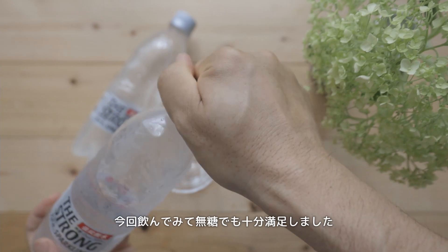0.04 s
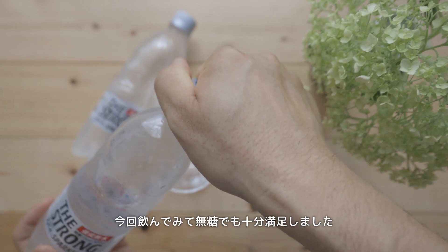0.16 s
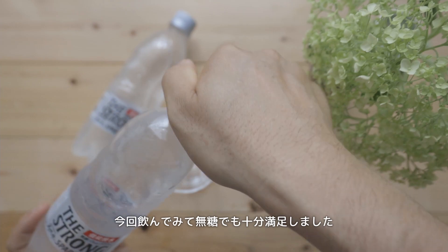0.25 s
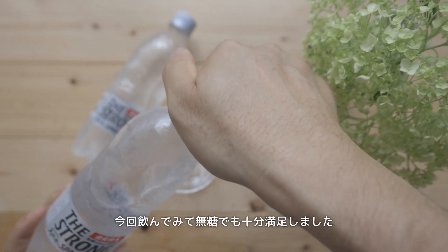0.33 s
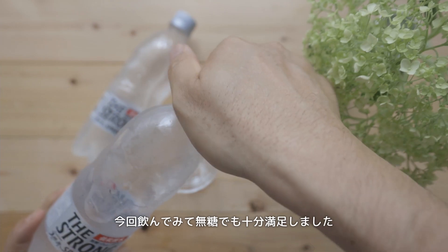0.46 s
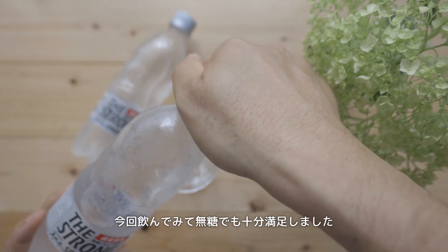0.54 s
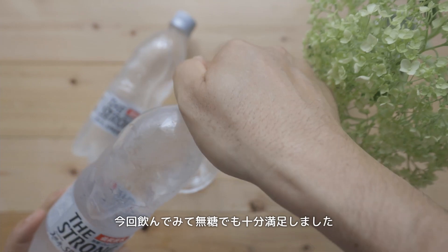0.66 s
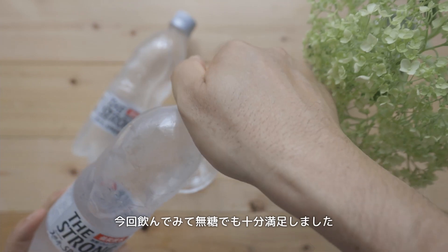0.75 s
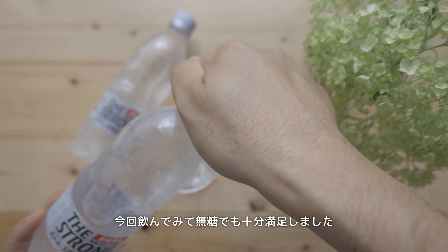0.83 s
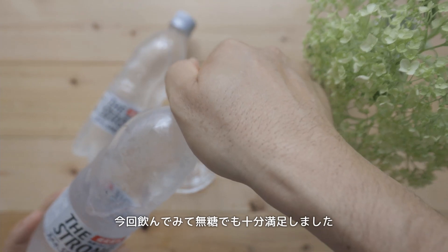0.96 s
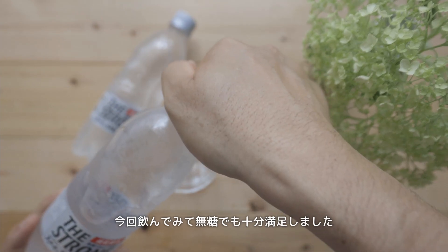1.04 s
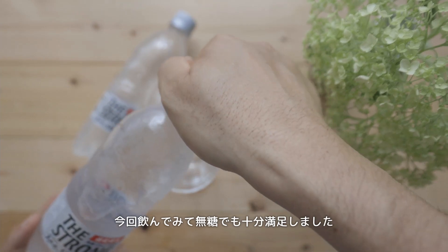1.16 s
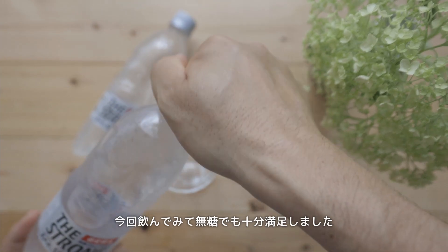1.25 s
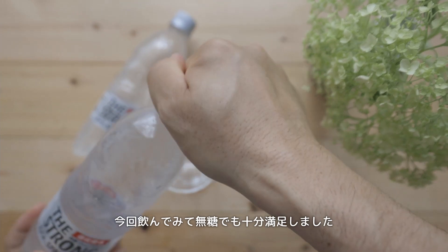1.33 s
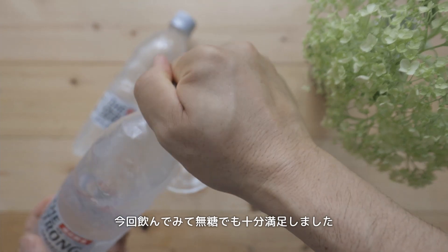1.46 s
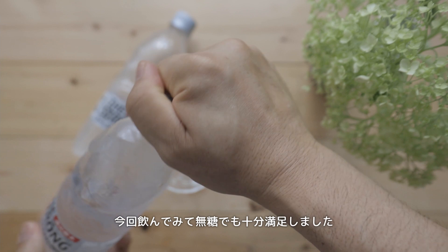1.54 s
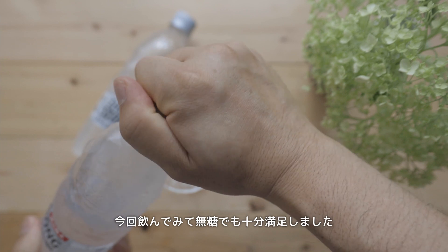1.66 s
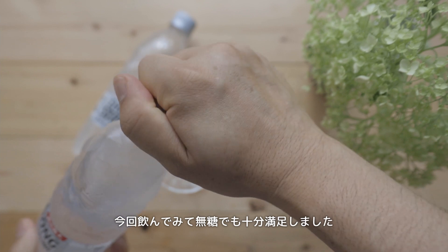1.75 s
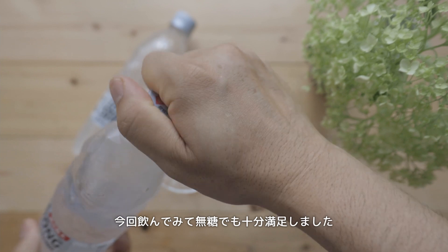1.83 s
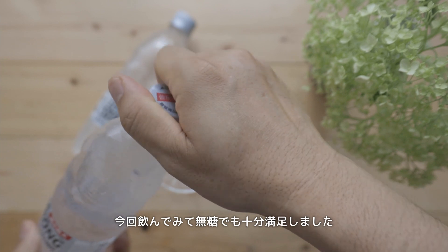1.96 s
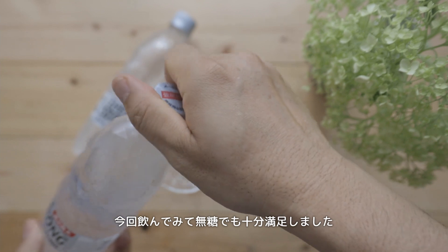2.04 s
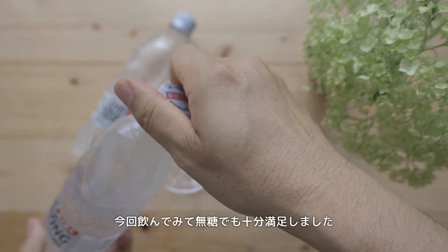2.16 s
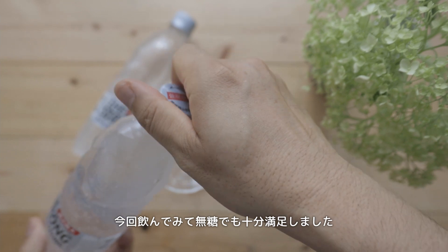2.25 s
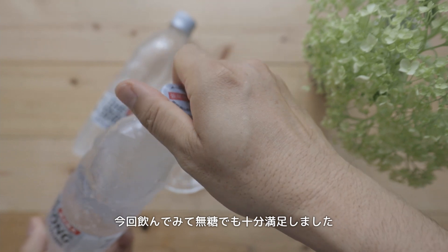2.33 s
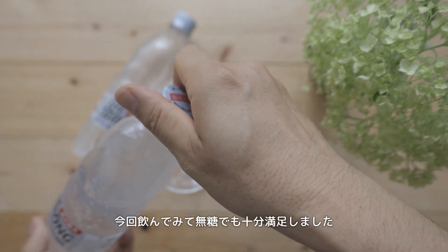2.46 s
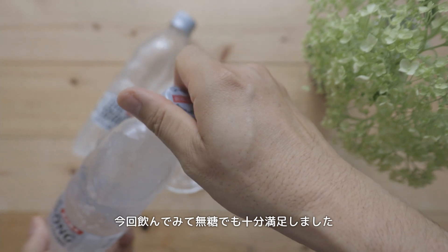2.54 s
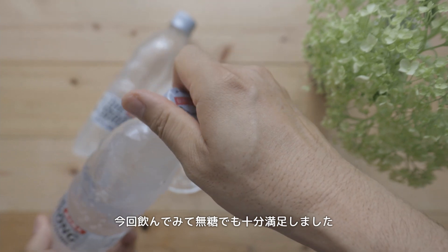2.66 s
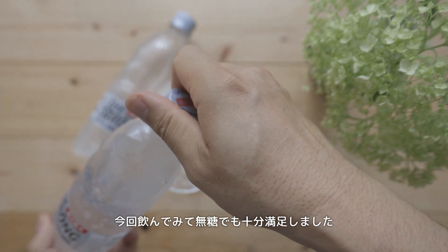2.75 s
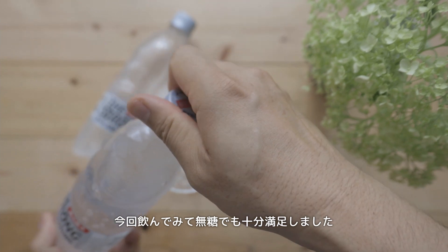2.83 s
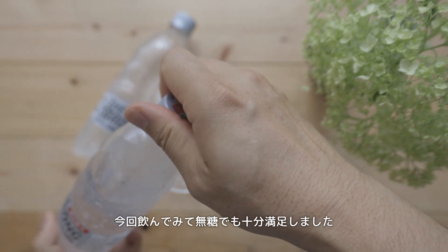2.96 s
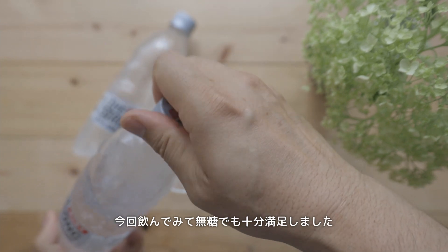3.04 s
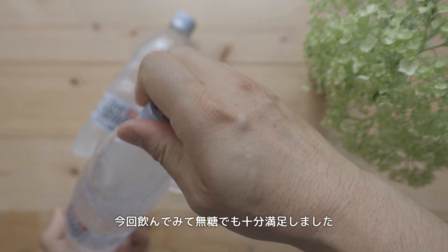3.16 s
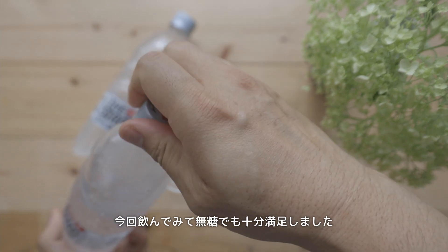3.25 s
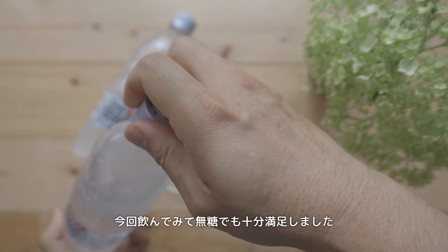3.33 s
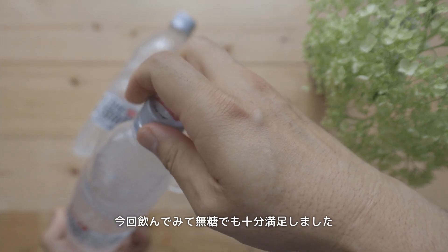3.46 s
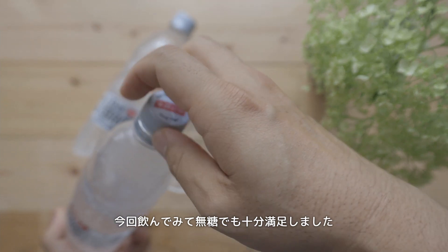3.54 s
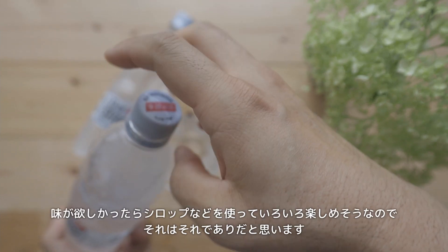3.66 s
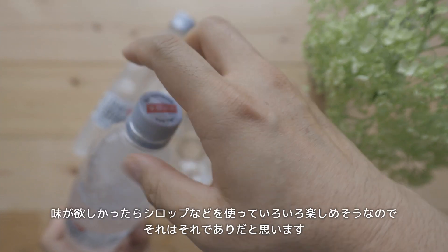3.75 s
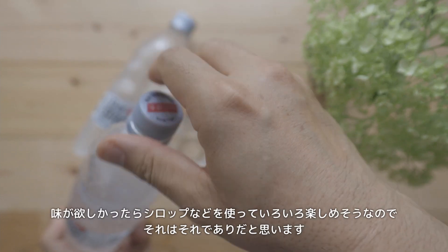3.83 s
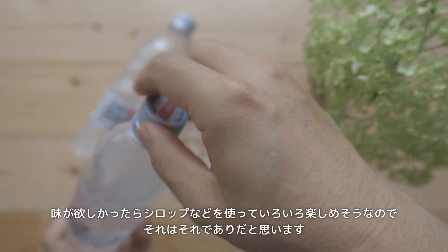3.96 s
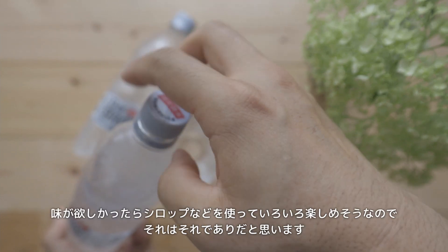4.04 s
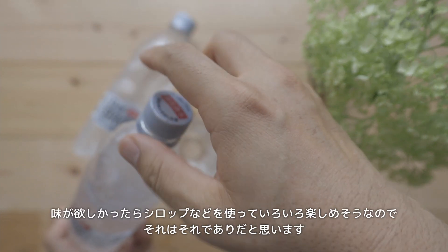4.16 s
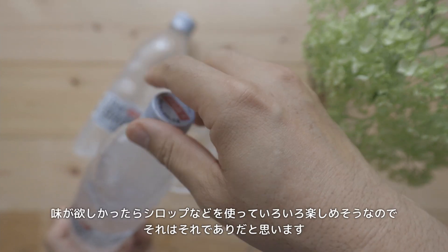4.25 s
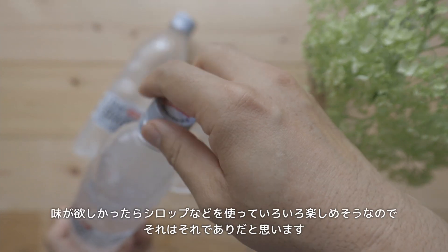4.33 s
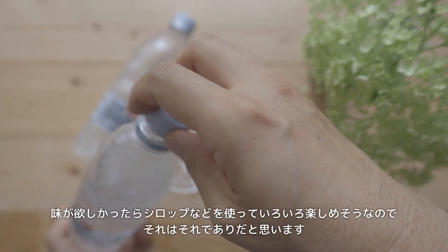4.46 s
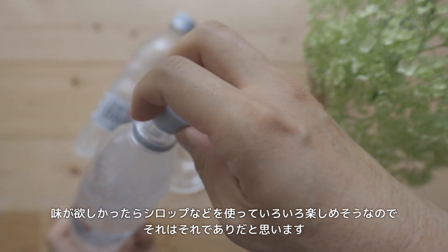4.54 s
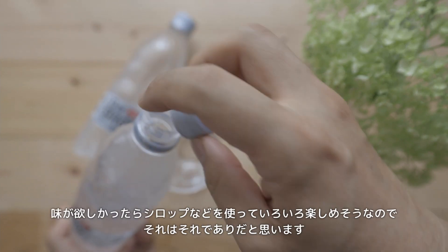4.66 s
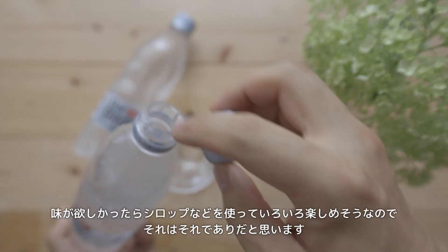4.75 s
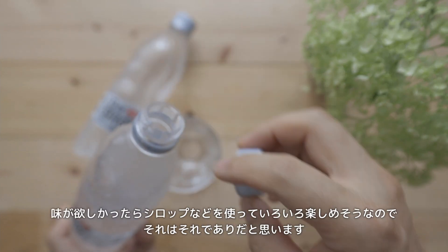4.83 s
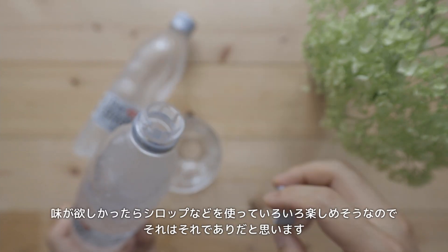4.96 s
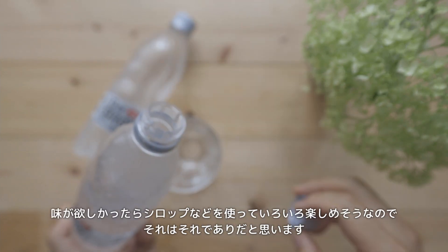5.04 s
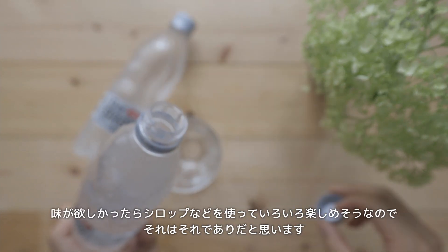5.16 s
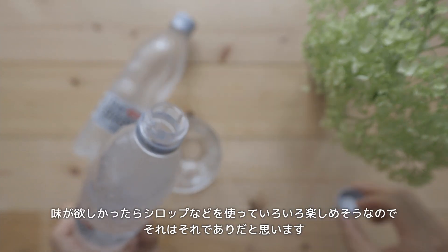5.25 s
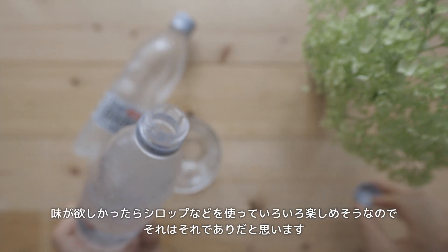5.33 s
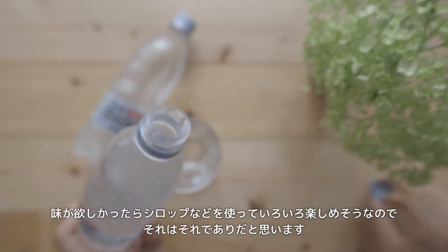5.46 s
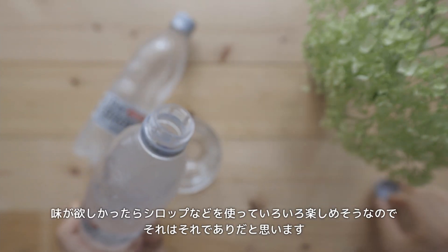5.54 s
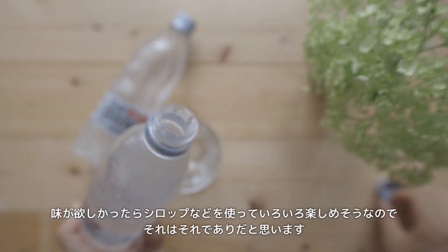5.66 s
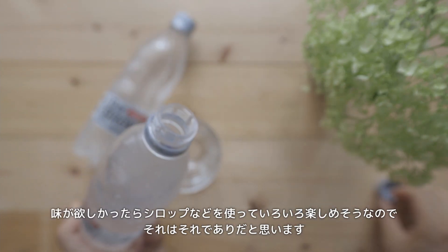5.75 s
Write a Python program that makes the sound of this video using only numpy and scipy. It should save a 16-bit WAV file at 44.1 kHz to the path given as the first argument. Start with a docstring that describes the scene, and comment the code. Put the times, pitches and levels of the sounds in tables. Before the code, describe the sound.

In a quiet room with a low ventilation rumble, a plastic bottle of sparkling water is opened close to the microphone. Gas seeps, then bursts out in a short, squealing hiss. After a pause the safety ring snaps sharply, and the cap clicks and scrapes softly off the neck. A few tiny bubbles pop, and the cap is set down on a wooden table a little farther away.

```python
"""A quiet room, a plastic bottle of sparkling water close to the camera's microphone.
Over low ventilation rumble the lens bumps faintly as it focuses, on and off for the first few seconds.
Gas seeps past the seal, then squeals and hisses out through the cap's thread. The safety ring snaps,
the cap knocks and scrapes off the neck, and a few bubbles prick in the bottle.
Last, the cap is put down on a wooden table, farther from the microphone, with more room on it."""
import sys
import numpy as np
from scipy import signal
from scipy.fft import rfft, irfft
from scipy.io import wavfile

SR = 44100
rng = np.random.default_rng(int(sys.argv[2]) if len(sys.argv) > 2 else 0)


def log_audio(samples):
    """Write samples as a 16-bit WAV file to the path given in sys.argv[1]."""
    # one column per channel
    frames = np.atleast_2d(samples).T
    # limit to full scale, then quantise
    limited = np.clip(frames, -1, 1)
    pcm = np.round(limited * 32767).astype(np.int16)
    wavfile.write(sys.argv[1], SR, pcm)


N = 255780
TIME = np.arange(N) / SR
RING_TIME = TIME[:SR // 5]
BIN_HZ = np.fft.rfftfreq(N, 1 / SR)


def amp(db):
    """Decibels to gain."""
    return 10 ** (np.asarray(db) / 20)


def unit(x):
    """Scales to rms 1."""
    return x / np.sqrt(np.mean(x ** 2) + 1e-20)


def read(points, hz):
    """Reads a table on a log-frequency axis."""
    point_hz, value = np.transpose(points)
    return np.interp(np.log(hz + 1), np.log(point_hz + 1), value)


def add(mix, start_s, sound):
    """Mixes a sound in at start_s."""
    part = mix[..., round(start_s * SR):][..., :sound.shape[-1]]
    part += sound[..., :part.shape[-1]]


def lowpass(hz):
    """Second-order low-pass sections."""
    return signal.butter(2, hz, fs=SR, output="sos")


def colour(x, spectrum, size=2048):
    """Causal filter with the given spectrum; white noise keeps its power."""
    log_gain = np.log(unit(amp(read(spectrum, abs(np.fft.fftfreq(size, 1 / SR))))))
    taps = np.fft.ifft(np.exp(np.conj(signal.hilbert(log_gain)))).real
    return signal.fftconvolve(x, taps[None], axes=1)[:, :x.shape[1]]


def noise(gain, likeness, balance):
    """Stereo noise of rms 1 from a gain per bin and tables of left-right likeness and balance."""
    left, independent = rfft(rng.standard_normal((2, N)))
    shared = np.clip(read(likeness, BIN_HZ), -1, 1)
    right = shared * left + np.sqrt(1 - shared ** 2) * independent
    lean = amp(read(balance, BIN_HZ) / 2)
    return unit(irfft(gain * np.array([left * lean, right / lean]), N))


def dying(t60):
    """Envelope that falls 60 dB in t60 seconds."""
    return np.exp(-np.log(1000) * RING_TIME / t60)


def ring(modes):
    """Dying sines of a struck body; neighbouring modes start in opposite directions."""
    return sum((-1) ** k * amp(db) * dying(t60) * np.sin(2 * np.pi * hz * RING_TIME)
               for k, (hz, db, t60) in enumerate(modes))


def flutter(hz):
    """Smooth random motion of rms 1, up to about the given rate."""
    return unit(signal.sosfilt(lowpass(hz), rng.standard_normal(N)))


def blend(a, b, share):
    """Equal-power mix from a to b."""
    share = np.clip(share, 0, 1)
    return np.sqrt(1 - share) * a + np.sqrt(share) * b


def ramp(start_s, length_s):
    """Rises from 0 to 1 over the given time."""
    return np.clip((TIME - start_s) / length_s, 0, 1)


# Room tone at the microphone: frequency_hz, density_db
TONE_SPECTRUM = [(15, -16.5), (35, -9.5), (75, -10), (98, -1), (125, 0), (220, -11.5), (600, -15),
                 (980, -13.5), (1200, -20), (2400, -24), (3300, -27.5), (9000, -31), (15000, -34)]
# Its stereo image: frequency_hz, left_right_correlation
TONE_LIKENESS = [(60, 1), (150, 0.43), (380, 0.58), (950, 0.61), (2380, 0.6), (5980, 0.72), (15000, 0.85)]
# Its balance: frequency_hz, left_minus_right_db
TONE_BALANCE = [(60, -1), (240, -0.5), (950, -1.0), (3770, -0.5), (15000, 0.0)]


def room_tone(level_db=-61, waver_db=1.7, rumble_hz=1200):
    """Low, gently wavering ventilation rumble under a thin even hiss."""
    air = noise(amp(read(TONE_SPECTRUM, BIN_HZ)), TONE_LIKENESS, TONE_BALANCE)
    rumble = signal.sosfiltfilt(lowpass(rumble_hz), air)
    waver = amp(waver_db * flutter(3.5))
    return amp(level_db) * (air + rumble * (waver - 1))


# Modes of the camera body: pitch_hz, level_db, t60_s
CAMERA_MODES = [(85, 2, 0.11), (123, -0.5, 0.051), (314, -4.5, 0.046), (515, 1.5, 0.013), (749, -4, 0.048)]
# Modes of the focus drive: pitch_hz, level_db, t60_s
DRIVE_MODES = [(1820, 3, 0.039), (2490, 14.5, 0.0029), (3020, -6, 0.018)]
# Runs of the focusing lens: start_s, length_s, clock_beats_per_step, level_db
FOCUS_RUNS = [(0.882, .06, 1, -55), (0.938, .02, 1, -48), (2.526, .02, 1, -51), (2.584, .29, 2, -52),
              (2.868, .02, 1, -54.5), (2.961, .06, 1, -52), (3.097, .15, 1, -52), (3.267, .11, 1, -53),
              (3.427, .15, 1, -53.5), (3.635, .02, 1, -44)]


def lens(clock_hz=24, tick_lead_s=.018, tick_db=-67.5, travel_s=0.00796, stop_db=-2, pan_db=-6.0):
    """At each step the drive ticks, then the lens bumps the camera body on starting and on stopping."""
    out, body, tick = np.zeros(N), ring(CAMERA_MODES), ring(DRIVE_MODES)
    for start_s, length_s, beats, db in FOCUS_RUNS:
        for step_s in np.arange(start_s, start_s + length_s, round(beats) / clock_hz):
            bump = amp(db + 0.8 * rng.standard_normal()) * body
            add(out, step_s - tick_lead_s, amp(tick_db) * tick)
            add(out, step_s, bump)
            add(out, step_s + travel_s * rng.uniform(0.896, 1.067), amp(stop_db) * bump)
    low_cut = signal.butter(2, 65, "highpass", fs=SR, output="sos")
    return signal.sosfilt(low_cut, out) * amp([[pan_db / 2], [-pan_db / 2]])


# Gas seeping past the seal: full_flow_s, hold_s, rise_s (per 20 dB), level_db
LEAKS = [(1.47, 0.049, .2, -68), (1.55, 0.27, 0.0094, -40.5), (2.659, 0.075, 0.095, -67.5)]


def outflow(burst_s=1.566, burst_db=-15.5, jump_s=0.0038, widen_s=.042, widen_db=12, spent_s=1.708,
            sag_db_per_s=35, collapse_db_per_s=309, squeal_s=.068, squeal_fade_s=.016, jet_fade_s=0.13):
    """The seal leaks, then lets go: the flow jumps, swells as the gap widens, sags and collapses."""
    leak = 0
    for full_s, hold_s, rise_s, db in LEAKS:
        rise_db = -20 * np.maximum(full_s - TIME, 0) / rise_s
        leak += amp(db + rise_db - collapse_db_per_s * np.maximum(TIME - full_s - hold_s, 0))
    age = np.maximum(TIME - burst_s, 0)
    swell_db = -20 * np.maximum(burst_s - TIME, 0) / jump_s - widen_db * (1 - ramp(burst_s, widen_s))
    sag_db = sag_db_per_s * np.maximum(age - widen_s, 0)
    collapse_db = collapse_db_per_s * np.maximum(TIME - spent_s, 0)
    burst = amp(burst_db + swell_db - sag_db - collapse_db)
    flow = np.hypot(leak, burst) + amp(-140)
    burst_share = (burst / flow) ** 2
    jet_fade = np.exp(-(np.maximum(age - squeal_s, 0) / jet_fade_s) ** 2)
    jet_share = (flow / amp(burst_db)) ** .7 * jet_fade
    # dull behind the closed seal; the burst brightens as the gas runs out
    brightening_db = -4.5 + 70.5 * np.minimum(age, spent_s - burst_s)
    treble_db = -9 * (TIME < burst_s) + burst_share * brightening_db
    # the thread squeals most while the gap is narrow
    narrowness = 0.85 - 0.65 * ramp(burst_s + squeal_s - squeal_fade_s, squeal_fade_s)
    squeal_share = burst_share * ramp(burst_s - jump_s, squeal_fade_s) * narrowness
    return flow, jet_share, treble_db, squeal_share


# Seeping gas: frequency_hz, density_db
LEAK_SPECTRUM = [(300, -34.5), (1200, -19.5), (2500, -6.5), (3500, -4.5), (5500, 0), (8000, -3.5),
                 (10500, -9.5), (13000, -7), (15000, -6)]
# Resonances of the air under the cap: pitch_hz, width_hz, level_db
CAVITY_MODES = [(2550, 140, 9.5), (5860, 242, 7), (7800, 400, 2)]
# Resonances of the narrow thread passage: pitch_hz, level_db
THREAD_MODES = [(1350, -19.5), (1780, -18.5), (2080, -13.5), (2350, -14.5), (2610, -8.5), (3240, -9.5),
                (3970, -4.5), (4630, -9.5), (5100, 0), (5870, 0), (6440, 1), (7100, -5), (7500, -5.5),
                (7800, 1), (8280, -2), (8900, -4.5), (9350, -0.5), (10100, -5), (10500, -3.5), (11200, -7),
                (12150, -6), (12780, -9), (13650, -5.5), (14300, -6.5)]
# The wide-open jet: frequency_hz, density_db
JET_SPECTRUM = [(120, -52.5), (200, -23.5), (338, -26.5), (540, -19), (912, -18.5), (1170, -15),
                (1380, -26), (1540, -16.5), (2290, -20), (2550, -15.5), (2850, -20), (3010, -12.5),
                (5170, -7), (7550, -2), (15000, -9.5)]
# Stereo image of the gas: frequency_hz, left_right_correlation
GAS_LIKENESS = [(100, .1), (600, 0.1487), (2200, 1), (5800, 0.93), (6800, 0.86), (7600, .82), (9200, .35),
                (12500, .25), (14500, 0.92)]
# Its balance: frequency_hz, left_minus_right_db
GAS_BALANCE = [(400, -4.5), (2000, -0.5), (5800, -0.4), (6500, -4.5), (7600, -2), (9500, -1), (12500, -4),
               (14500, 2)]


def gas(sputter_db=0.7, treble_hz=8500, puff_s=1.636, puff_width_s=.03, puff_db=-26):
    """Close up, a leak sings in the cap, squeals through the thread and opens into a broad jet."""
    flow, jet_share, treble_db, squeal_share = outflow()
    cavity = np.sqrt(1 + sum(amp(db) ** 2 / (1 + (2 * (BIN_HZ - hz) / width_hz) ** 2)
                             for hz, width_hz, db in CAVITY_MODES))
    # steep resonances with dark valleys between them; the high ones are wider
    thread = sum(amp(db) / (1 + ((BIN_HZ - hz) / (80 + .012 * hz)) ** 2) ** 2 for hz, db in THREAD_MODES)
    leak = noise(amp(read(LEAK_SPECTRUM, BIN_HZ)) * cavity, GAS_LIKENESS, GAS_BALANCE)
    jet = noise(amp(read(JET_SPECTRUM, BIN_HZ)), GAS_LIKENESS, GAS_BALANCE)
    squeal = noise(thread, GAS_LIKENESS, GAS_BALANCE)
    hiss = blend(blend(leak, jet, jet_share), squeal, squeal_share)
    treble = irfft(rfft(hiss) / (1 + (treble_hz / (BIN_HZ + 1)) ** 6), N)
    hiss = (hiss + (amp(treble_db) - 1) * treble) * amp(sputter_db * flutter(350))
    # the strongest outflow blows a low puff of wind across the microphone
    wind = noise(1 / np.hypot(1, BIN_HZ / 300), GAS_LIKENESS, GAS_BALANCE)
    puff = wind * amp(puff_db) * np.exp(-((TIME - puff_s) / puff_width_s) ** 2)
    return (hiss + puff) * flow


# Slipping plastic: frequency_hz, density_db
CRUNCH_SPECTRUM = [(100, -3.5), (450, -14.5), (1000, -11.5), (1450, -2.5), (2200, 7), (3300, 2.5),
                   (4300, -1.5), (7900, 3.5), (11800, -11.5), (14500, 0)]


def contact(body, top_hz, slip_t60_s, slip_db, spread):
    """The struck body rings and the plastic crunches briefly; a soft contact loses its treble."""
    middle, side = rng.standard_normal((2, len(RING_TIME)))
    slip = colour((middle + spread * np.array([side, -side])) * dying(slip_t60_s), CRUNCH_SPECTRUM)
    return signal.sosfilt(lowpass(min(top_hz, SR / 2 - 1000)), body + amp(slip_db) * slip)


# Modes of the cap: pitch_hz, level_db, t60_s
CAP_MODES = [(950, -3, 0.024), (1755, 0, 0.033), (2210, -6, 0.023), (2390, 3.5, 0.016), (2660, -12, 0.026),
             (3430, 10.5, 0.01), (5160, -2, 0.033), (5310, -8, 0.0085), (6140, -26, 0.012),
             (6400, -28, .01), (8150, -20, 0.0087), (7500, -34, 0.0074), (9900, 1, 0.0074),
             (10960, -4, 0.012), (14210, -4, .009), (14760, 4, 0.011)]
# The bottle's hollow knock: pitch_hz, level_db, t60_s
BOTTLE_MODES = [(391, 0.5, 0.067), (543, -5.5, 0.07), (925, 2, 0.015), (1430, -11.5, 0.027)]
# Snaps and taps at the neck: start_s, level_db, top_hz, relative_knock_db
CAP_HITS = [(3.1426, -16, 17900, -28), (3.416, -51, 5920, -5), (3.6, -48, 4510, -16),
            (3.638, -53, 1800, -3.5), (3.977, -48.5, 2990, -12), (4.0058, -39.5, 4000, -13.5),
            (4.0122, -45, 9000, -13), (4.031, -48, 3500, -15), (4.07, -41.5, 14000, -13),
            (4.082, -40, 15000, -25), (4.3438, -41.5, 5000, -12.5), (4.353, -53, 7000, -9),
            (4.385, -53, 4450, -6), (4.464, -51, 3500, -2), (4.539, -42, 3400, -26),
            (4.542, -42.5, 3200, -5), (4.5611, -47, 3200, -3.5)]


def cap_hits(ring_db=-13):
    """Near the microphone the safety ring snaps and the cap knocks against the neck."""
    out, cap, knock = np.zeros((2, N)), amp(ring_db) * ring(CAP_MODES), ring(BOTTLE_MODES)
    for start_s, db, top_hz, knock_db in CAP_HITS:
        snap = contact(cap, top_hz, slip_t60_s=0.025, slip_db=-1.0, spread=0.42)
        add(out, start_s, amp(db) * (snap + amp(knock_db) * knock))
    return out


# Plastic rubbing on plastic: frequency_hz, density_db
SCRAPE_SPECTRUM = [(300, -9.5), (1050, 3.5), (1500, -3), (1900, 1.5), (2750, 5.5), (4100, -6.5), (5100, 1),
                   (6200, -6), (7800, -6), (9000, -11), (10000, 1.5), (11500, -40), (14500, -23)]
# Scrapes along the thread: peak_s, length_s, level_db, top_hz
SCRAPES = [(3.577, .035, -56.5, 3730), (3.625, 0.038, -53, 3640), (3.67, 0.041, -58.5, 3900),
           (4.039, 0.049, -51.5, 5500), (4.083, 0.032, -40.5, 6050), (4.44, 0.12, -59.5, 6000),
           (4.552, 0.056, -58, 5030)]


def cap_scrapes(grains_per_s=7000, grain_db=3.0, spread=0.084, dull_hz=3500, fade_ratio=0.85):
    """The turning cap moves in tiny slips; each scrape swells, then dies a little faster."""
    grain_size = amp(grain_db * np.minimum(rng.exponential(1, N), 4))
    slipping = rng.random(N) < grains_per_s / SR
    middle, side = grain_size * slipping * rng.standard_normal((2, N))
    grains = unit(colour(middle + spread * np.array([side, -side]), SCRAPE_SPECTRUM))
    dull = signal.sosfiltfilt(lowpass(dull_hz), grains)
    out = np.zeros((2, N))
    for peak_s, length_s, db, top_hz in SCRAPES:
        width_s = length_s / 2 * np.where(TIME < peak_s, 1, fade_ratio)
        pressure = np.exp(-((TIME - peak_s) / width_s) ** 2)
        brightness = np.clip(1 - dull_hz / top_hz, 0, 1)
        out += amp(db) * pressure * (dull + brightness * (grains - dull))
    return out


# The larger bubbles in the open bottle: start_s, level_db, pitch_hz
BUBBLES = [(4.654, -52.5, 8500), (4.878, -54, 12700), (4.891, -54.5, 11070), (4.9, -57, 7980),
           (4.9235, -54, 7510), (5.464, -55, 9370), (5.4815, -50.5, 9060), (5.716, -47, 14500),
           (5.7645, -50, 8000)]


def bubbles(t60_s=0.016, band_ratio=1.18, fizz_count=7, fizz_start_s=4.6, fizz_db=-62.5, fizz_hz=9516):
    """Each bubble bursts with a short high prick; the small ones fizz at random once the cap is off."""
    out = np.zeros((2, N))
    fizz = [(fizz_start_s + when * (TIME[-1] - fizz_start_s), fizz_db, fizz_hz * 2 ** (pitch - .5))
            for when, pitch in rng.random((fizz_count, 2))]
    for start_s, db, hz in BUBBLES + fizz:
        burst = rng.standard_normal(len(RING_TIME)) * dying(t60_s)
        band_hz = [hz / band_ratio, min(hz * band_ratio, SR / 2 - 500)]
        film = signal.butter(1, band_hz, "bandpass", fs=SR, output="sos")
        add(out, start_s, amp(db) * signal.sosfilt(film, burst))
    return out


# Modes of the wooden table: pitch_hz, level_db, t60_s
WOOD_MODES = [(423, -13, 0.032), (590, -11.5, 0.028), (835, -10.5, 0.064), (1294, -2, 0.016),
              (1930, -1.5, 0.032), (2840, -10.5, 0.02), (3730, 0, 0.028), (4250, -1, 0.011),
              (5700, 1.5, 0.0072)]
# The cap landing on it: start_s, level_db, top_hz, slip_t60_s
TABLE_TAPS = [(5.695, -38.5, 5000, 0.014), (5.6968, -33, 5340, 0.0059), (5.7005, -58, 4200, 0.019),
              (5.7093, -35, 1690, 0.0089), (5.7126, -54, 1505, 0.033), (5.7435, -40, 1000, 0.026)]


def cap_on_table(ring_db=-6):
    """The cap's rim ticks on the wood, then the cap drops flat with a duller tap."""
    out, wood = np.zeros((2, N)), amp(ring_db) * ring(WOOD_MODES)
    for start_s, db, top_hz, slip_t60_s in TABLE_TAPS:
        add(out, start_s, amp(db) * contact(wood, top_hz, slip_t60_s, slip_db=-0.5, spread=0.23))
    return out


# Decay of the small room: frequency_hz, t60_s
ROOM_DECAY = [(200, 0.53), (1000, 0.21), (3000, 0.16), (8000, 0.15), (15000, .16)]


def room(x, first_s=0.0083, dull_hz=9500, wall_s=.017, wall_db=-13):
    """One wall echo and dense reflections come back to the microphone; the treble dies first."""
    hz, t, spectra = signal.stft(rng.standard_normal((2, SR // 2)), SR, nperseg=256)
    decay = np.exp(-np.log(1000) * t / read(ROOM_DECAY, hz)[:, None])
    spectra = spectra * decay / np.hypot(1, (hz / dull_hz) ** 2)[:, None]
    tail = signal.istft(spectra, SR, nperseg=256)[1]
    tail *= TIME[:tail.shape[1]] > first_s
    tail /= np.linalg.norm(tail[0])
    add(tail, wall_s, amp([wall_db]))
    return signal.fftconvolve(x, tail, axes=1)[:, :N]


def scene(hiss_room_db=-22, bottle_room_db=-14, table_room_db=-6, bottle_pan_db=-1):
    """The bottle is near the microphone; the table is farther off and so sounds wetter."""
    hiss, table = gas(), cap_on_table()
    bottle = (cap_hits() + cap_scrapes() + bubbles()) * amp([[bottle_pan_db / 2], [-bottle_pan_db / 2]])
    send = amp(hiss_room_db) * hiss + amp(bottle_room_db) * bottle + amp(table_room_db) * table
    return hiss + bottle + table + room(send) + lens() + room_tone()


def record(dry):
    """The recorder's band limit, at 15120 Hz."""
    band_limit = signal.firwin(401, 15120, window=("kaiser", 9), fs=SR)
    return signal.oaconvolve(dry, band_limit[None], "same")


dry = scene()
out = record(dry)
log_audio(out)
```